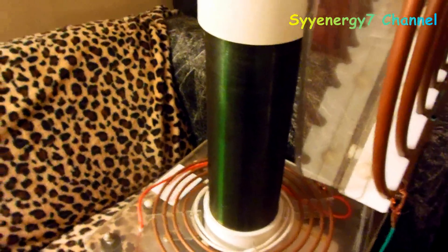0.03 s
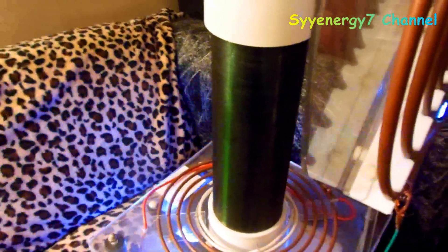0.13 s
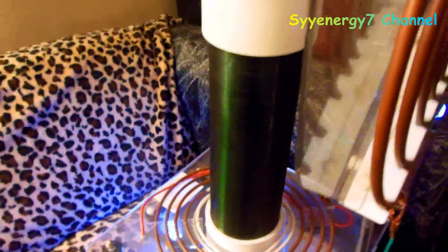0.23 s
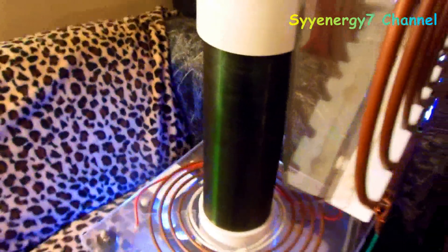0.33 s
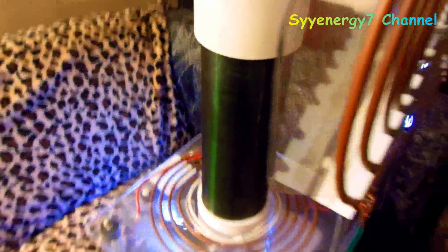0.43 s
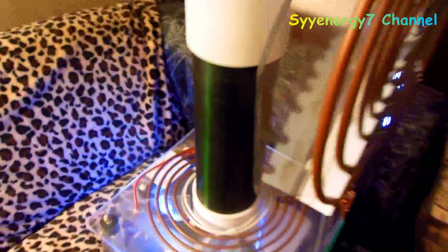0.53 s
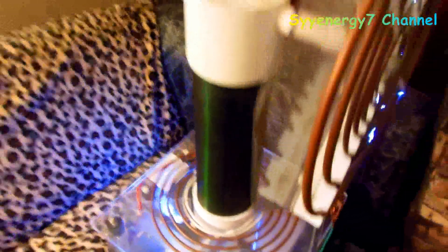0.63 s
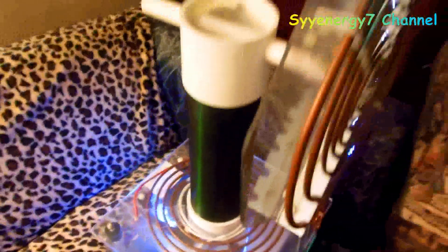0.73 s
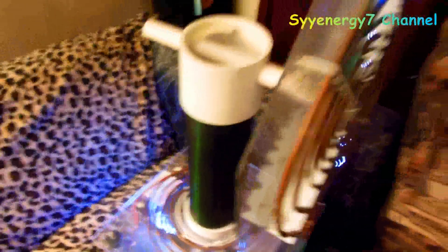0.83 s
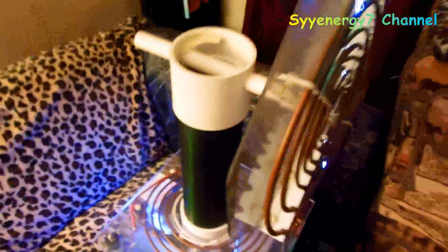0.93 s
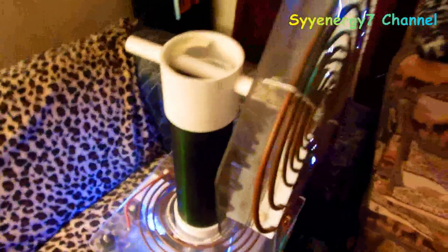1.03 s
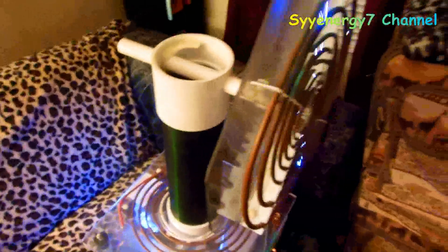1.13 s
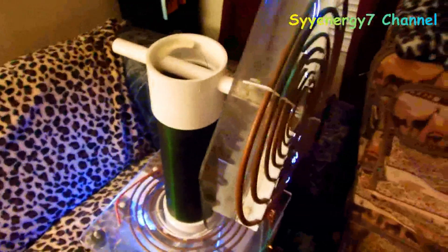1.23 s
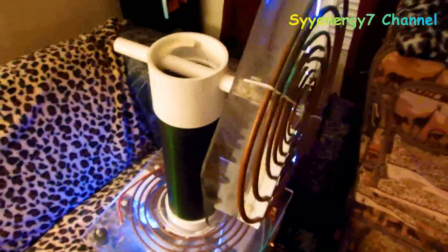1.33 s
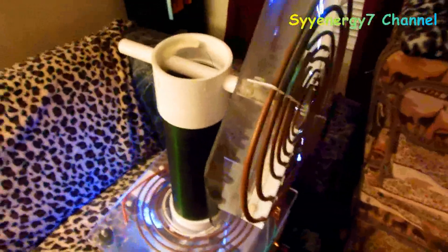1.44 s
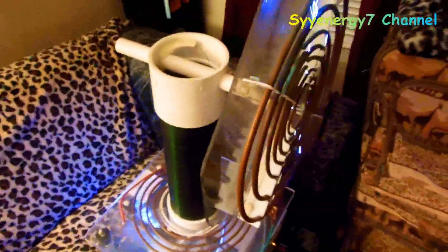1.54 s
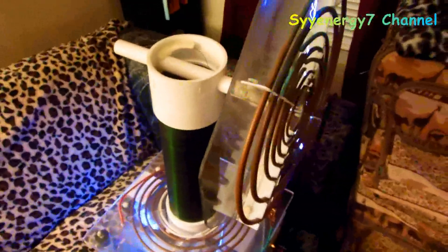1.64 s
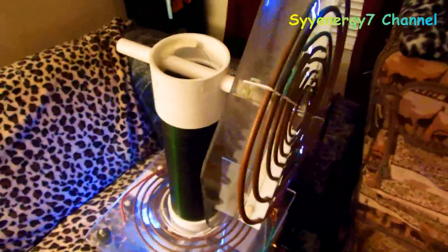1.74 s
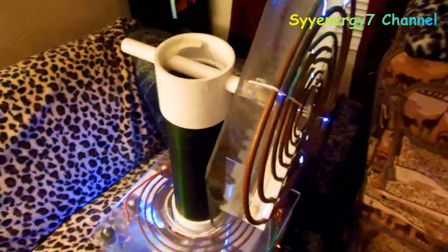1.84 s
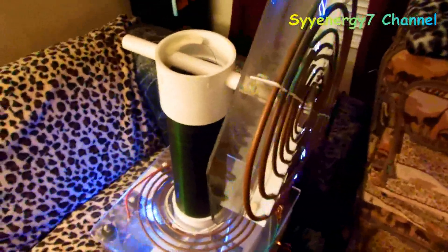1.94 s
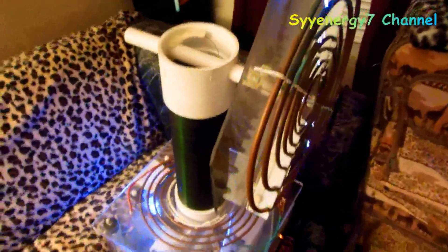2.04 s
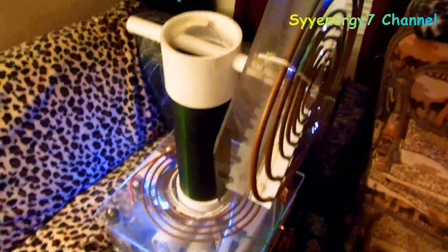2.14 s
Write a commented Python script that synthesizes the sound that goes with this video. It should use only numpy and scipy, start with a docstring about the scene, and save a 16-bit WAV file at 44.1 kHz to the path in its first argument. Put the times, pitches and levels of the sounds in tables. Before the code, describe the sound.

Harsh electrical arcing buzz in a quiet furnished room: near silence with faint hum, a clack, then an overloaded hissing blast with rumbling jolts, dropping within a second to a steady crackling buzz, microphone moving away.

```python
"""A quiet furnished room, with a hand-held stereo microphone close to a spark-gap coil, then backing away.
A faint tick, the clack of the switch, then the gap snaps about one and a half times each mains half-cycle.
At first the snaps overload the capsules into a hiss; echoes off the coil and a diffuse room tail follow each.
Jolts in the microphone circuit, one small with every snap and larger ones from a list, are low thumps.
Behind lie steady hum tones, thin whines and filtered noise for the air."""
import sys
import numpy as np
from scipy import signal
from scipy.fft import rfft, irfft
from scipy.io import wavfile

SR = 44100
rng = np.random.default_rng(int(sys.argv[2]) if len(sys.argv) > 2 else 0)


def to_wav(sig):
    """Store sig (one row per channel, or 1-D mono) as 16-bit WAV at the path in sys.argv[1].

    Samples outside -1..1 are clipped; the rate is SR.
    """
    pcm = np.clip(np.atleast_2d(sig), -1, 1) * 32767
    pcm = np.round(pcm).astype(np.int16)
    wavfile.write(sys.argv[1], SR, pcm.T)  # frames by channels


def gain_from_db(level_db):
    """Turn a decibel level (scalar or array-like) into a linear amplitude factor."""
    decades = np.asarray(level_db, float) / 20
    return 10 ** decades


N = 97020

ON_S, MAINS_HZ = .1945, 60
MOST_SNAPS = 500  # random scatter is drawn for this many
# the capacitor fills around this moment of each half-cycle, over this spread
CREST_MS, CHARGING_MS = 2.75, 1.15
SNAPS_PER_HALF_CYCLE, GAP_SCATTER, SIZE_SCATTER_DB = 1.52, .13, 1.8  # gap scatter: share of a full charge
OTHER_POLARITY_SNAP_DB = -2.5  # snaps on every second half-cycle are softer
# level of the snaps as the microphone backs away: time_s, level_db
SNAP_LEVEL = [(.19, 8), (.202, 29), (.3, 24), (.45, 21.5), (.56, 17.5), (.7, 13.5), (.8, 11), (.92, 4),
              (1.05, 0), (1.18, -2), (1.35, -0.5), (1.7, 1.5), (2.0, 0), (2.2, -0.5)]
# spectral shape of a snap, relative: pitch_hz, level_db
SNAP_COLOUR = [(180, -43.5), (300, -24.5), (420, -23), (640, -23.5), (1180, -17), (1680, -15), (2240, -20),
               (2900, -8.5), (3600, -13), (4800, -6.5), (6300, -7.5), (8370, -5), (10000, -4.5),
               (11900, -3.5), (14000, -3)]
# echoes off the coil's frame and base, before sway: late_ms, share_left, share_right
ECHOES = [(.245, .5, .3), (.515, .85, .95), (.38, .1, .2), (1.3, .12, .12)]
# stretch of the echo delays as the hand-held microphone sways: time_s, stretch (ratio)
SWAY = [(.2, .85), (.6, .92), (.85, .98), (1.1, 1.01), (1.4, 1.02), (1.56, .96), (1.62, 1.01), (1.9, 1.0),
        (2.2, .98)]
LEFT_LATE_MS, RIGHT_LATE_MS = 0.011, 0.00019
ECHO_SCATTER_MS, ECHO_SCATTER_DB = .006, 2.5  # the arc never strikes at quite the same place
STRAY_DB, STRAY_SPREAD_MS = -13, .65  # five small stray echoes
# level of the room's answer against the snaps: time_s, level_db
ROOM_LEVEL = [(.19, 6), (.5, 5), (.72, 0), (.95, -1.5), (2.2, -1.5)]
ROOM_T60_S, ROOM_ALIKE_HZ = 0.29, 3780  # both capsules hear mostly the same room below this pitch
ROOM_SHIFT_S = .15  # the swaying microphone meets a new echo pattern this often
# larger jolts in the circuit: start_s, held_s, recovery_s, depth_left, depth_right (full scale, before coupling)
JOLTS = [(0.2186, 0.002, 0.002, 0.325, -0.661), (0.3025, 0, 0.008, 0.824, 0.809),
         (0.361, 0.011, 0.016, 0.19, 0.099), (0.3782, 0.004, 0.004, 0.444, 0.257),
         (0.4195, 0, 0.008, 0.35, 0.17), (0.4349, 0.004, 0.016, 0.725, 0.47),
         (0.4676, 0.016, 0.001, 0.345, 0.344), (0.5016, 0.007, 0.001, -0.056, 0.406),
         (0.502, 0, 0.2, 0.718, 0.576), (0.5283, 0.007, 0.001, 0.962, 0.806),
         (0.5361, 0.002, 0.004, -0.024, 0.662), (0.5429, 0.002, 0.001, 0.669, 0.265),
         (0.5429, 0.016, 0.04, 0.285, 0.409), (0.5528, 0, 0.2, 0.362, 0.298),
         (0.5696, 0.007, 0.002, 0.441, 1.382), (0.5782, 0.007, 0.002, 0.066, 0.428),
         (0.6014, 0.004, 0.04, 0.996, 0.55), (0.61, 0.004, 0.2, -0.233, 0.681),
         (0.6195, 0.007, 0.001, 1.398, 0.81), (0.6435, 0.016, 0.002, 0.62, 0.09),
         (0.6512, 0.004, 0.016, 0.831, 1.048), (0.6544, 0.004, 0.001, 0.328, 0.418),
         (0.6585, 0.004, 0.001, 0.65, 0.223), (0.6698, 0.007, 0.004, 1.711, 0.531),
         (0.6785, 0.007, 0.004, 0.442, 0.421), (0.7043, 0.011, 0.008, 0.699, 0.234),
         (0.7524, 0, 0.2, 0.679, 0.267), (0.8027, 0.016, 0.04, 0.461, 0.171),
         (0.8177, 0.016, 0.2, 0.216, 0.151), (0.8853, 0.016, 0.001, 0.115, 0.06),
         (0.9016, 0.011, 0.016, 0.217, 0.092), (0.9243, 0.016, 0.016, 0.056, 0.036),
         (1.0005, 0.011, 0.2, -0.001, -0.004), (1.0032, 0.011, 0.001, 0.03, 0.015),
         (1.2181, 0.016, 0.2, 0.011, 0.009), (1.2358, 0.016, 0.2, 0.028, 0.026),
         (1.3687, 0.016, 0.2, 0.01, 0.01), (1.4703, 0.016, 0.2, 0.012, 0.01),
         (1.7846, 0.007, 0.2, 0.053, 0.034), (1.8177, 0.016, 0.2, 0.027, 0.011),
         (1.834, 0.004, 0.2, 0.015, 0.012), (1.9179, 0.007, 0.2, 0.054, 0.025),
         (1.9515, 0, 0.04, 0.023, 0.004), (1.9687, 0.016, 0.2, 0.13, 0.066),
         (1.985, 0.016, 0.2, 0.024, 0.018), (2.0172, 0.016, 0.008, 0.013, 0.009),
         (2.0517, 0.016, 0.04, 0.099, 0.062), (2.0735, 0.016, 0.04, 0.015, 0.017),
         (2.0975, 0.016, 0.008, 0.012, 0.005), (2.1166, 0.016, 0.016, 0.018, 0.011)]
JOLT_RISE_S, COUPLING_HZ = .0005, 7
# depth of the small jolt with every snap: time_s, level_db
SMALL_JOLT_LEVEL = [(.19, -22), (.3, -13.5), (.5, -16), (.68, -2), (.73, -16.5), (.9, -37), (1.0, -46),
                    (1.3, -50), (1.75, -50), (2.2, -58)]
SMALL_JOLT_SCATTER_DB, SMALL_JOLT_RECOVERY_S = 4, 0.0023
# small jolts come before the sound; weaker on every second half-cycle
SOUND_LATE_MS, OTHER_POLARITY_JOLT_DB = 0.71, -7.5
OVERLOAD = 0.96  # ceiling of the capsules, full scale
# clack of the switch as it closes: start_s, level_db, pitch_hz, t60_s
SWITCH = [(.1945, -15.5, 1076, 0.1), (0.1963, -10.5, 1573, 0.038)]
# faint tick before the switch: start_s, level_db, pitch_hz, t60_s
TICK = [(.107, -35.5, 557, 0.017), (0.108, -47.5, 2500, 0.019)]
# hum and thin whines before the switch: pitch_hz, level_db (rms)
HUM = [(118.4, -53), (236.9, -69), (2293, -79), (12328, -78), (13194, -80)]
HUM_DROP_DB, HUM_DROP_S = -10, .3  # the room's hum is fainter once the buzz is on
# spectral shape of the air, relative: pitch_hz, level_db
AIR_COLOUR = [(15, -20), (25, 18), (129, -46), (155, -12.5), (182, -54), (372, -20), (472, -16), (554, -20),
              (14000, -37)]
AIR_GAIN_DB = -50
TOP_HZ = 14100


def firings():
    """The capacitor charges near each mains crest and the gap breaks when full; spare charge carries over."""
    t = np.arange(int(ON_S * SR), N) / SR
    phase_per_ms = 2 * np.pi * 2 * MAINS_HZ / 1000
    swing = np.cos((t * 1000 - CREST_MS) * phase_per_ms) - 1
    current = np.exp(swing / (CHARGING_MS * phase_per_ms) ** 2)
    # counted in full charges
    charge = np.cumsum(current) / np.mean(current) * SNAPS_PER_HALF_CYCLE * 2 * MAINS_HZ / SR
    gap_scatter, size_scatter = rng.standard_normal((MOST_SNAPS, 2)).T
    needed = 1 + GAP_SCATTER * gap_scatter
    full = np.cumsum(needed) - needed[0]  # the first snap comes at once
    fired = full < charge[-1]
    when = np.interp(full, charge, t)[fired]
    size_db = SIZE_SCATTER_DB * size_scatter[fired]
    return when, gain_from_db(size_db + OTHER_POLARITY_SNAP_DB * other_polarity(when))


def other_polarity(when):
    """True for moments in the second half of each mains cycle."""
    return when * MAINS_HZ % 1 > .5


def sparks(when, size):
    """Each snap is a click with near echoes and a diffuse room tail, filtered to the snap's colour."""
    paths = np.array([(0.0093, 0.84, 0.67)] + ECHOES)  # the direct sound comes first
    count = len(when)
    scatter = rng.standard_normal((MOST_SNAPS, 2, len(paths)))[:count]
    stray = rng.standard_normal((MOST_SNAPS, 5))[:count] * gain_from_db(STRAY_DB)
    stray_ms = rng.random((MOST_SNAPS, 5))[:count] * STRAY_SPREAD_MS
    stretch = np.interp(when, *np.array(SWAY).T)[:, None]
    path_ms = paths[:, 0] * stretch + ECHO_SCATTER_MS * scatter[:, 0]
    path_gain = gain_from_db(ECHO_SCATTER_DB * scatter[:, 1])
    delay_ms = np.hstack([path_ms, stray_ms])
    near = []
    for share, late_ms in ((paths[:, 1], LEFT_LATE_MS), (paths[:, 2], RIGHT_LATE_MS)):
        arrival = when[:, None] + (delay_ms + late_ms) / 1000
        strength = size[:, None] * np.hstack([share * path_gain, stray])
        near.append(impulses(arrival, strength))
    both = np.array(near) + curve(ROOM_LEVEL) * room(when, size)
    return colour(both, SNAP_COLOUR) * curve(SNAP_LEVEL)


def impulses(when, size):
    """Clicks placed to a quarter of a sample, then brought down to the sample rate."""
    fine = np.zeros(4 * N)
    place = np.clip((when * 4 * SR).astype(int), 0, 4 * N - 1)
    np.add.at(fine, place.ravel(), 4 * size.ravel())
    return signal.resample_poly(fine, 1, 4)


def room(when, size):
    """Diffuse decaying-noise tails, each heard for a short while and cross-faded into the next."""
    t = np.arange(SR // 3) / SR
    low = signal.butter(1, ROOM_ALIKE_HZ, "low", fs=SR, output="sos")
    high = signal.butter(1, ROOM_ALIKE_HZ, "high", fs=SR, output="sos")
    decay = np.exp(-np.log(1000) * t / ROOM_T60_S) * np.minimum(t / .005, 1)  # swells in over 5 ms
    out = 0
    for centre in np.arange(0, N / SR + ROOM_SHIFT_S, ROOM_SHIFT_S):
        noise = rng.standard_normal((3, len(t)))  # one shared, one for each capsule
        tail = (signal.sosfilt(low, noise[0]) + signal.sosfilt(high, noise[1:])) * decay
        tail = tail / np.sqrt(np.sum(tail[0] ** 2))
        share = np.cos(np.pi / 2 * np.clip((when - centre) / ROOM_SHIFT_S, -1, 1))
        clicks = np.bincount((when * SR).astype(int), size * share, N)
        out = out + signal.fftconvolve(clicks[None], tail, axes=1)[:, :N]
    return out


def jolts(when):
    """The circuit's rest level shifts, holds and recovers; coupling capacitors pull it back with an overshoot."""
    t = np.arange(N) / SR
    db = SMALL_JOLT_SCATTER_DB * rng.standard_normal(MOST_SNAPS)[:len(when)]
    db = db + OTHER_POLARITY_JOLT_DB * other_polarity(when)
    ahead = np.maximum(when - SOUND_LATE_MS / 1000, ON_S)
    small = impulses(ahead, gain_from_db(db)) * curve(SMALL_JOLT_LEVEL)
    rise = int(JOLT_RISE_S * SR / 3)  # small jolts rise in a third of the time
    out = -signal.lfilter(np.ones(rise) / rise, [1, -np.exp(-1 / SR / SMALL_JOLT_RECOVERY_S)], small)
    for start, held, recovery, left, right in JOLTS:
        since = np.maximum(t - start, 0)
        shift = np.minimum(since / JOLT_RISE_S, 1) * np.exp(-np.maximum(since - held, 0) / recovery)
        out = out - np.array([[left], [right]]) * shift
    return signal.sosfilt(signal.butter(2, COUPLING_HZ, "high", fs=SR, output="sos"), out)


def tick_and_switch():
    """Struck parts ring as decaying sines, alike in both channels."""
    t = np.arange(N) / SR
    out = np.zeros(N)
    for start, db, hz, t60 in TICK + SWITCH:
        since = t - start
        decay = (since > 0) * np.exp(-np.log(1000) * np.abs(since) / t60)
        out += gain_from_db(db) * decay * np.sin(2 * np.pi * hz * since)
    return out


def appliance_hum():
    """Appliance hum and thin whines are steady sines that fade to a lower level after the switch."""
    t = np.arange(N) / SR
    hum = sum(np.sqrt(2) * gain_from_db(db) * np.sin(2 * np.pi * (hz * t + rng.random())) for hz, db in HUM)
    return hum * gain_from_db(HUM_DROP_DB * np.clip((t - ON_S) / HUM_DROP_S, 0, 1))


def air():
    """Soft air is filtered noise, half of its power shared by the two channels."""
    noise = rng.standard_normal((3, N))
    return gain_from_db(AIR_GAIN_DB) * colour(noise[0] + noise[1:], AIR_COLOUR)


def curve(points):
    """Gain over time from (time_s, level_db) points."""
    p = np.array(points)
    return gain_from_db(np.interp(np.arange(N) / SR, p[:, 0], p[:, 1]))


def colour(x, points):
    """Minimum-phase filter of unit energy with the (pitch_hz, level_db) shape."""
    p = np.array(points)
    hz = np.maximum(np.arange(2049) * SR / 4096, 1)
    db = np.interp(np.log(hz), np.log(p[:, 0]), np.maximum(p[:, 1], -60))
    cepstrum = irfft(np.log(gain_from_db(db)))
    cepstrum[1:2048] *= 2  # folding the cepstrum forward makes the filter causal
    cepstrum[2049:] = 0
    h = irfft(np.exp(rfft(cepstrum)))
    h = h / np.sqrt(np.sum(h ** 2))
    return signal.fftconvolve(x, h[None], axes=1)[:, :N]


def scene():
    """Sound squashed by the overloaded capsules, plus the jolts in their circuit."""
    when, size = firings()
    sound = sparks(when, size) + tick_and_switch() + appliance_hum() + air()
    return OVERLOAD * np.tanh(sound / OVERLOAD) + jolts(when)


def top_cut(x):
    """Nothing passes above the cut-off."""
    return signal.sosfilt(signal.butter(12, 15540, fs=SR, output="sos"), x)


def record(dry):
    """A steep low-pass cuts the top, and peaks clip at full scale."""
    dull = signal.sosfilt(signal.ellip(12, .2, 60, TOP_HZ, fs=SR, output="sos"), dry)
    return top_cut(np.clip(dull, -1, 1))


dry = scene()
out = record(dry)
to_wav(out)
```